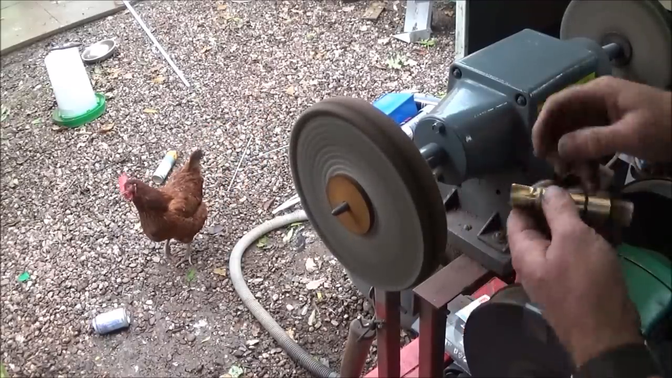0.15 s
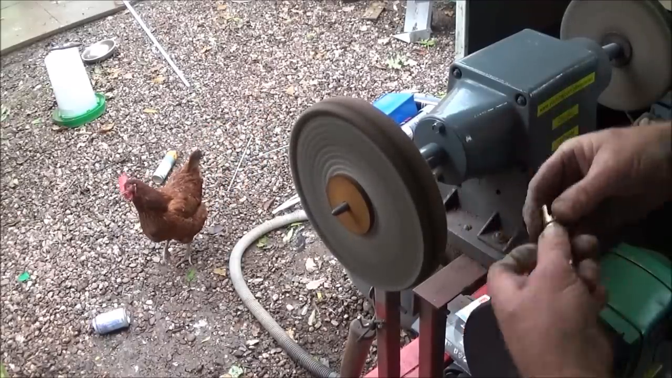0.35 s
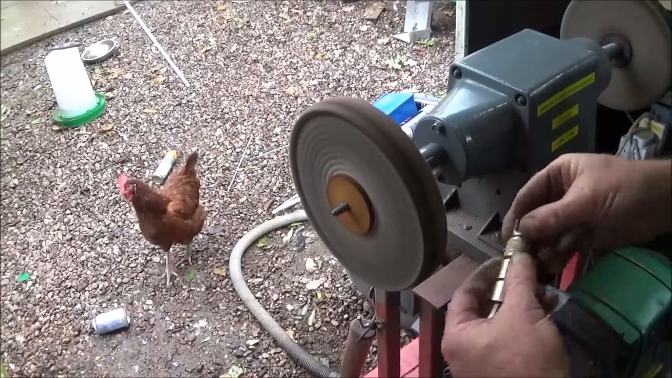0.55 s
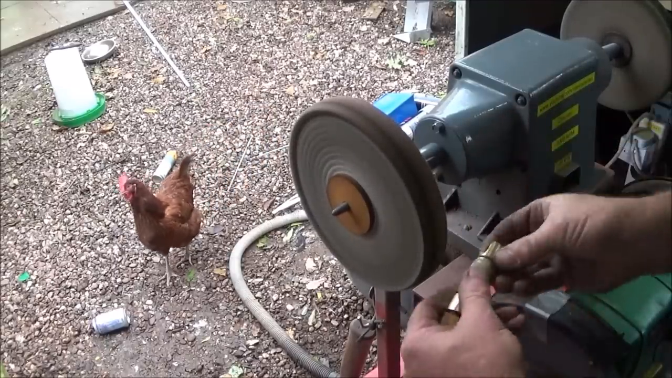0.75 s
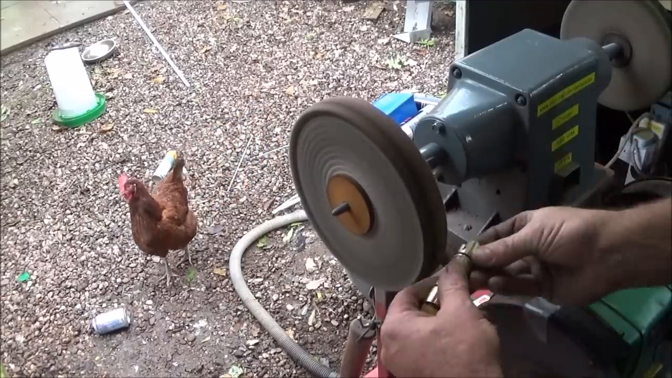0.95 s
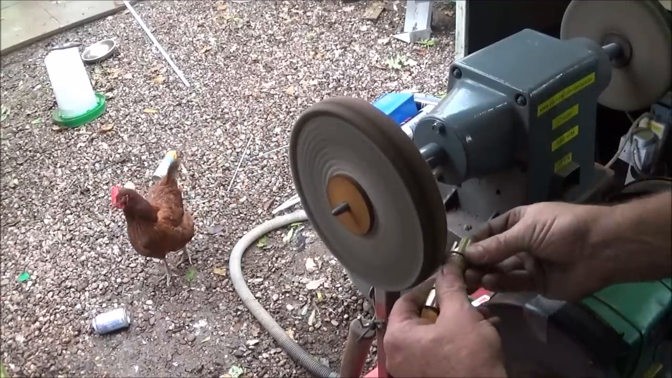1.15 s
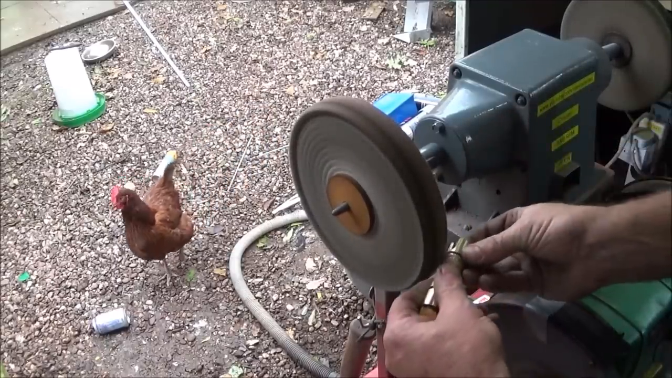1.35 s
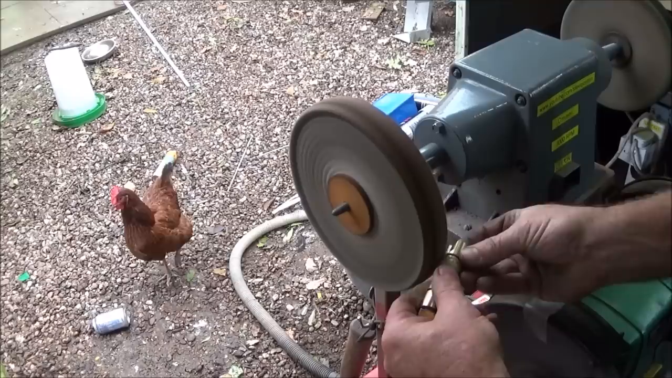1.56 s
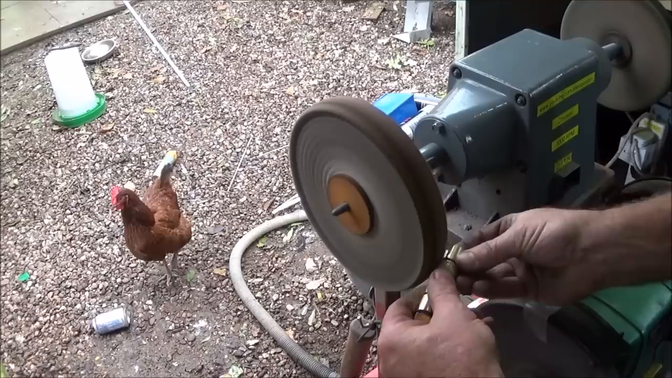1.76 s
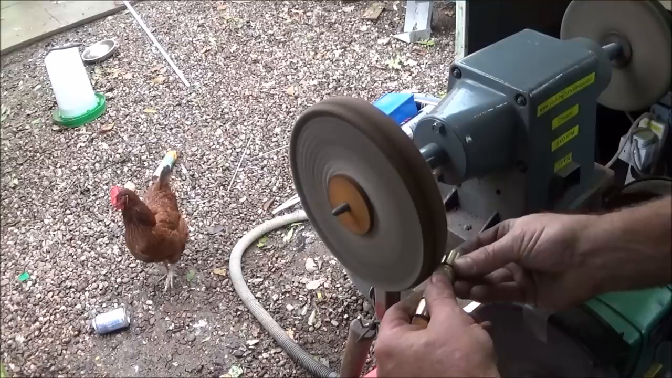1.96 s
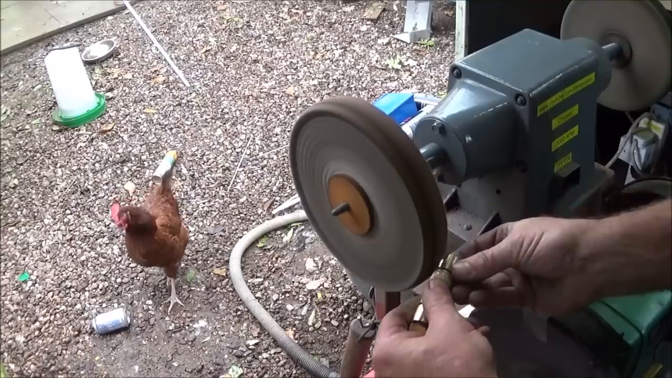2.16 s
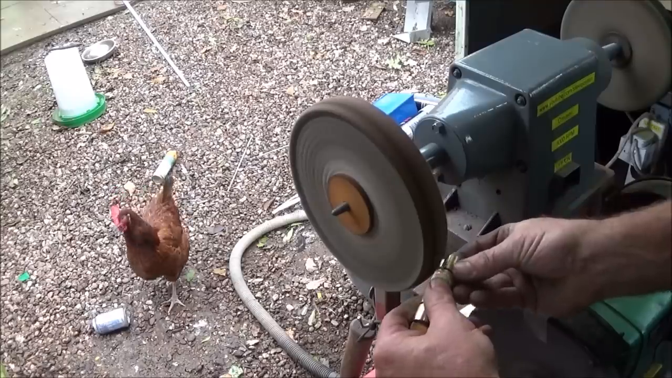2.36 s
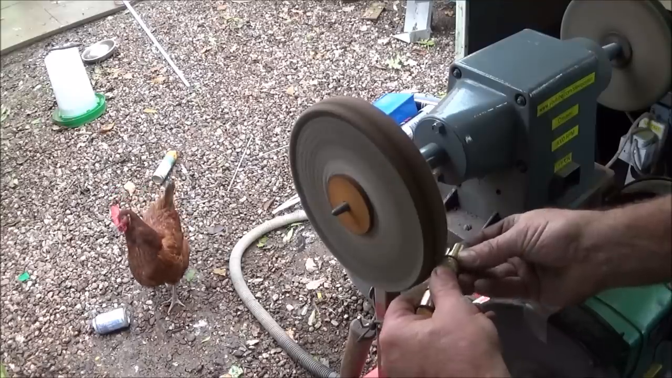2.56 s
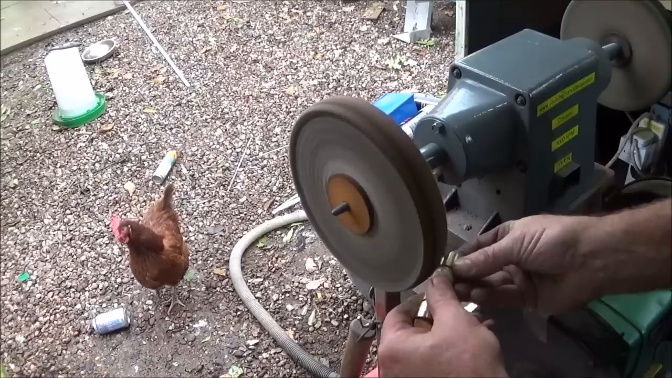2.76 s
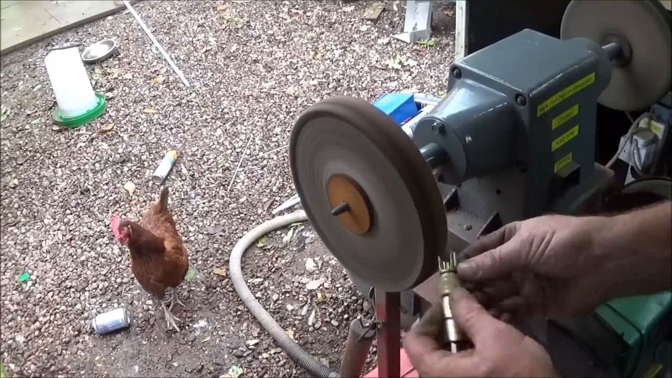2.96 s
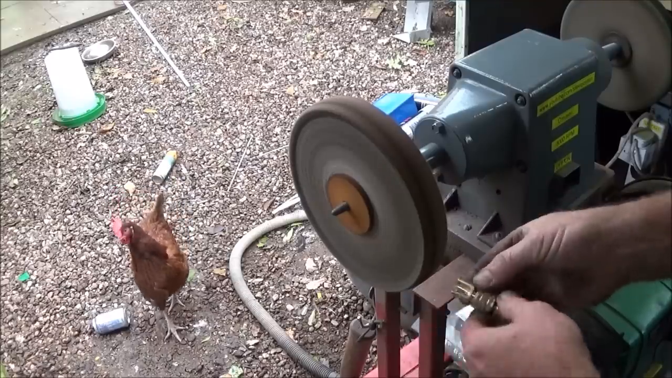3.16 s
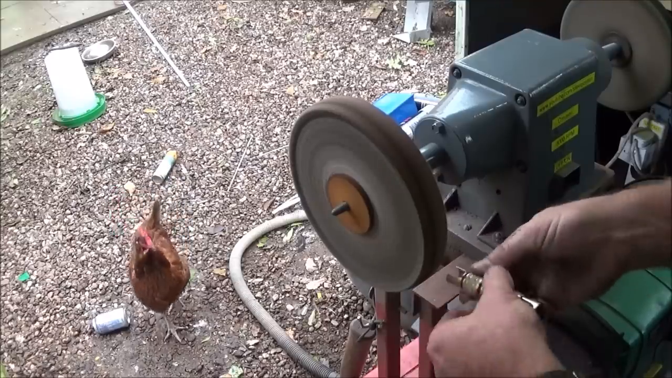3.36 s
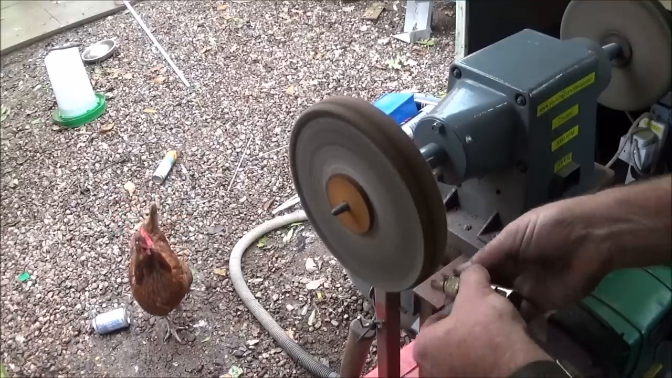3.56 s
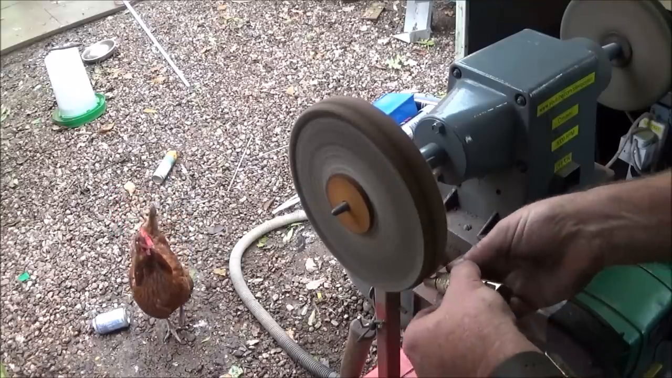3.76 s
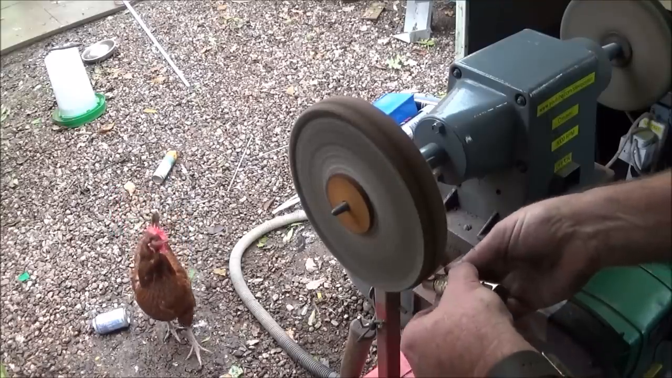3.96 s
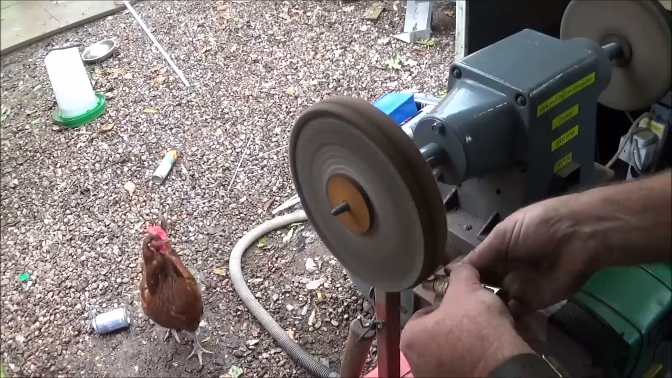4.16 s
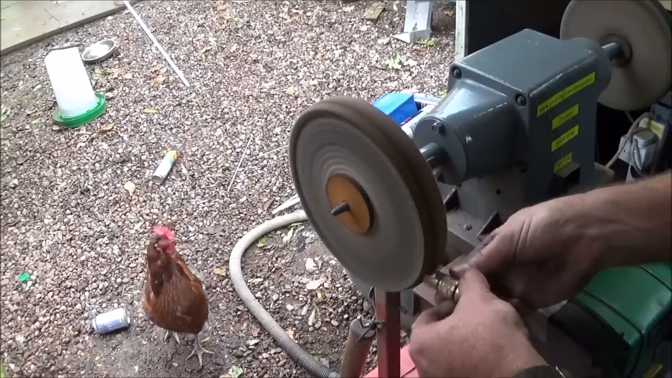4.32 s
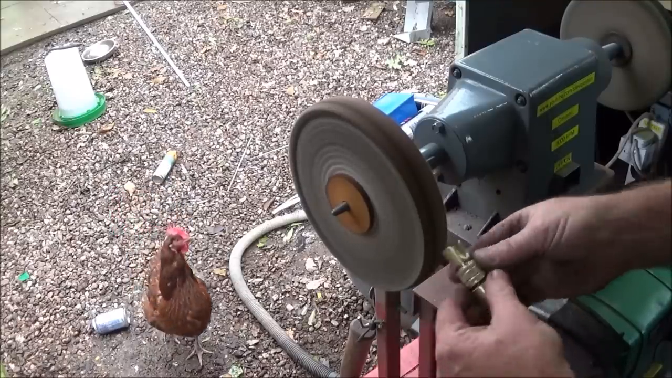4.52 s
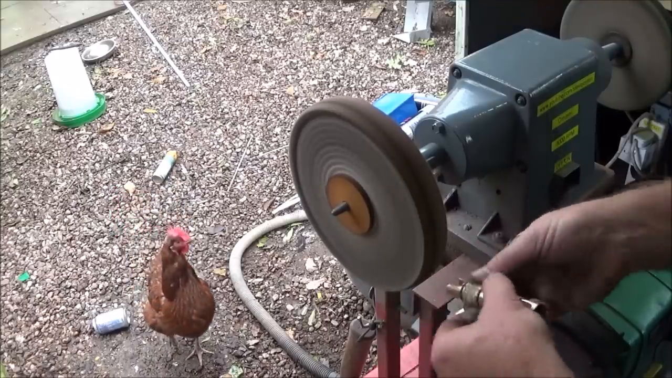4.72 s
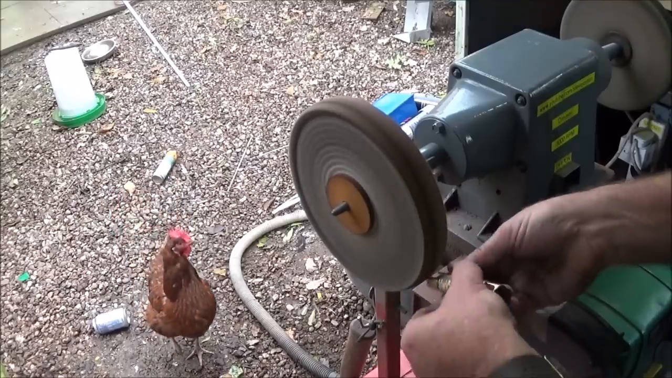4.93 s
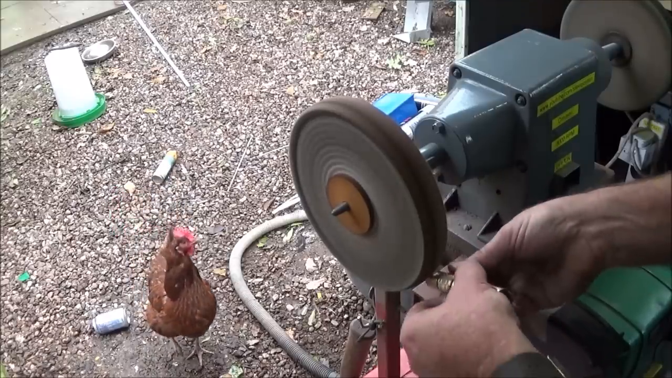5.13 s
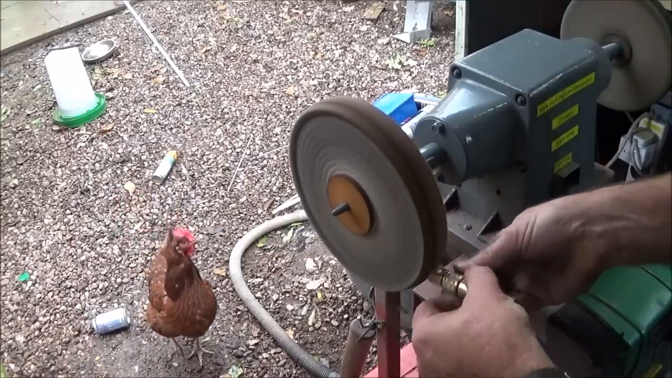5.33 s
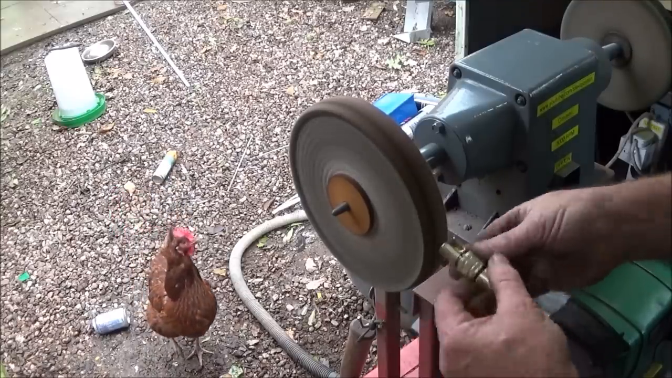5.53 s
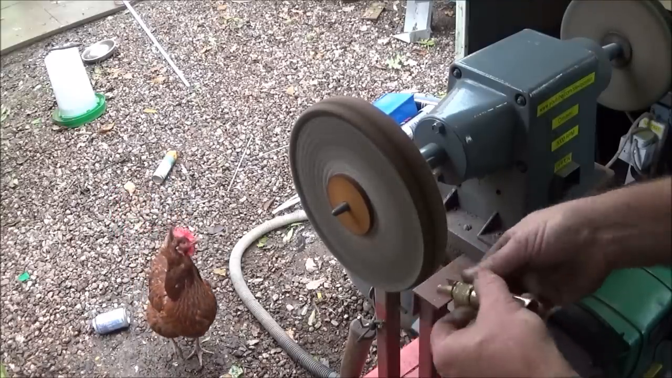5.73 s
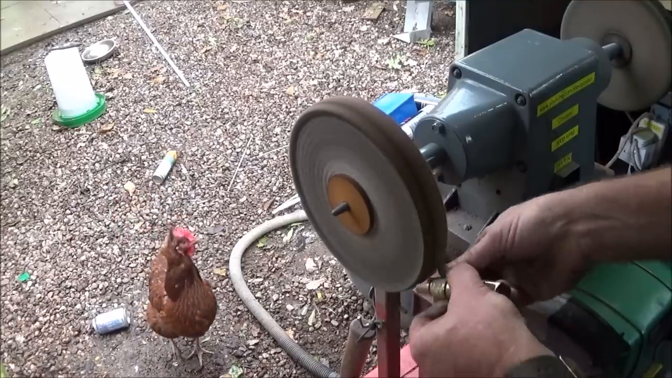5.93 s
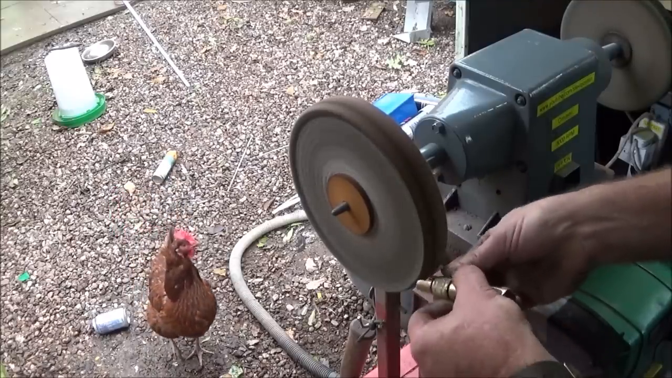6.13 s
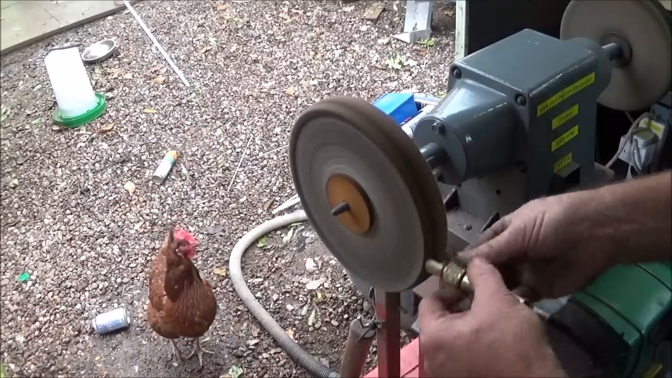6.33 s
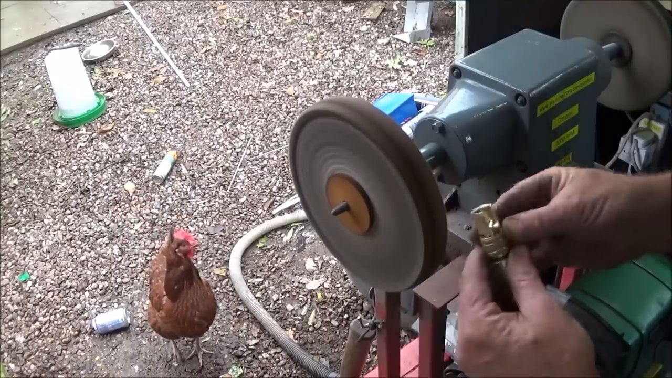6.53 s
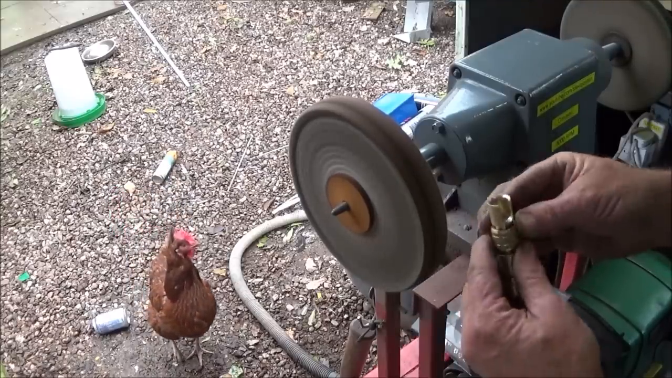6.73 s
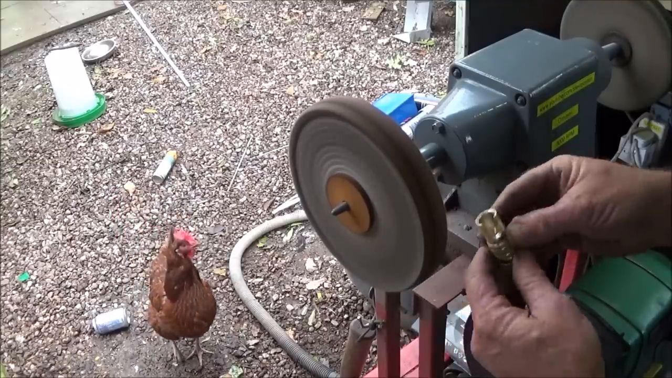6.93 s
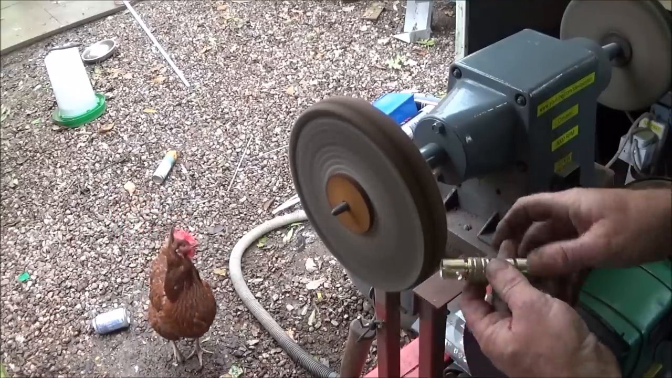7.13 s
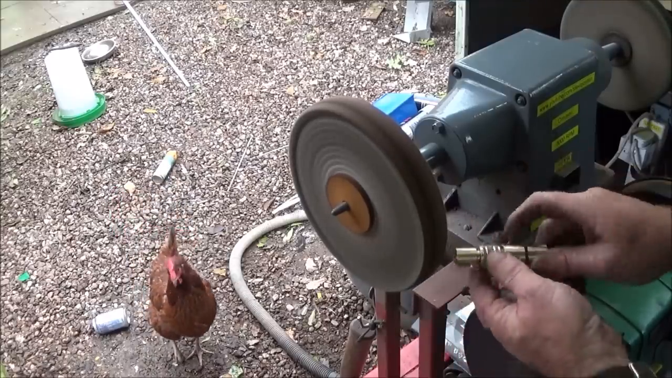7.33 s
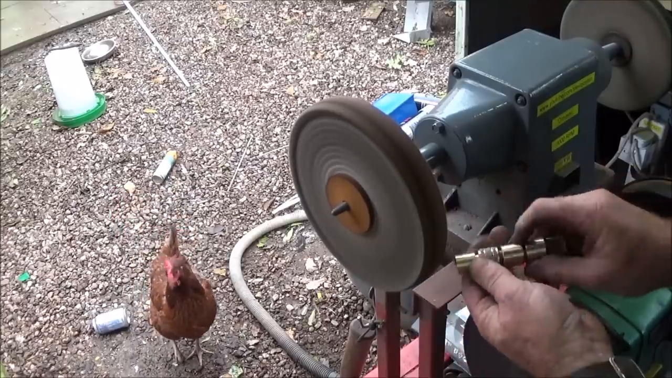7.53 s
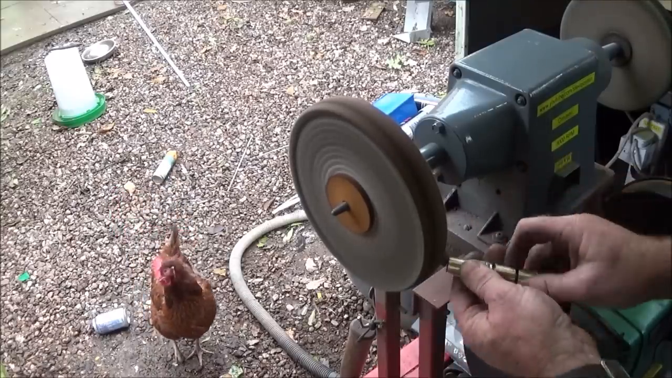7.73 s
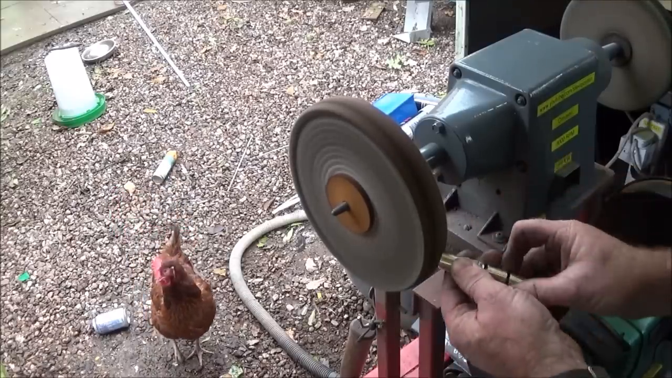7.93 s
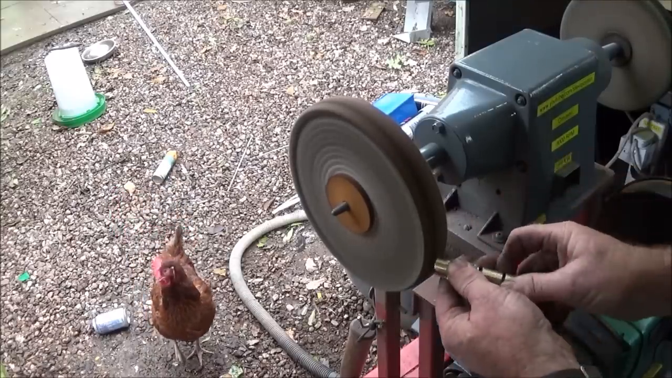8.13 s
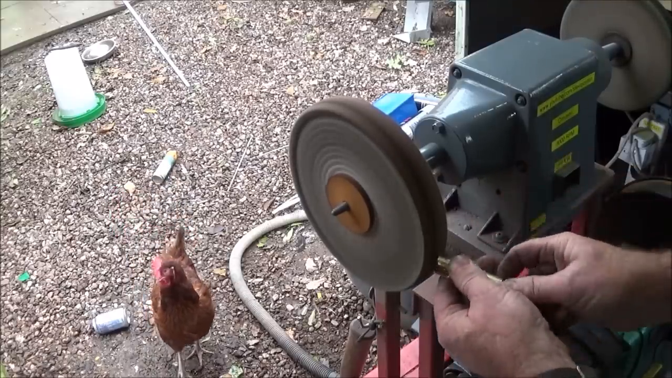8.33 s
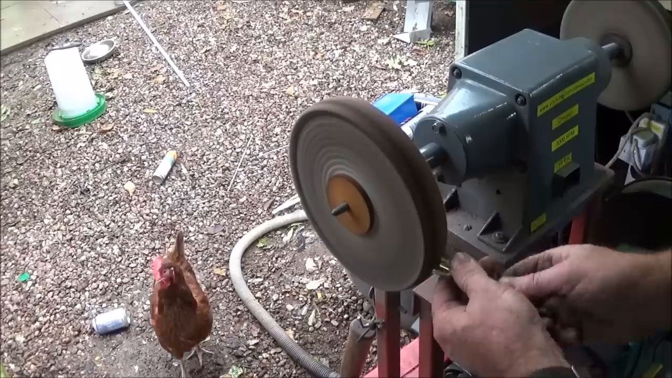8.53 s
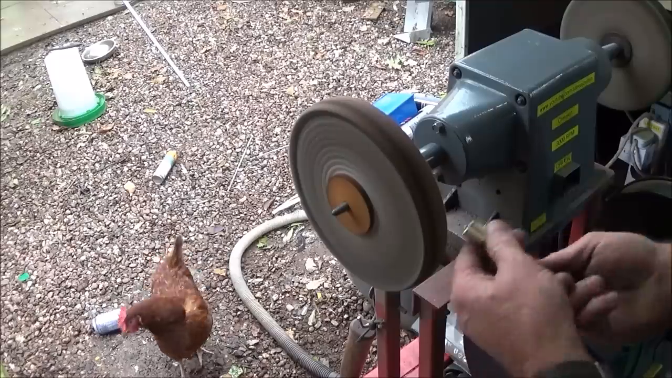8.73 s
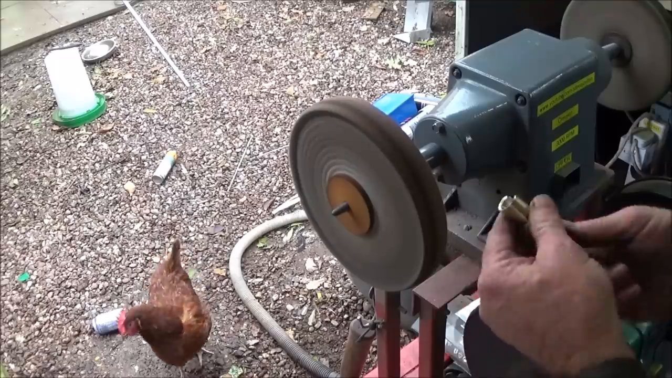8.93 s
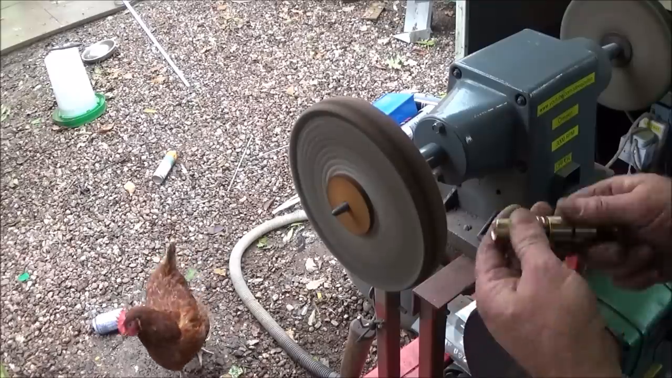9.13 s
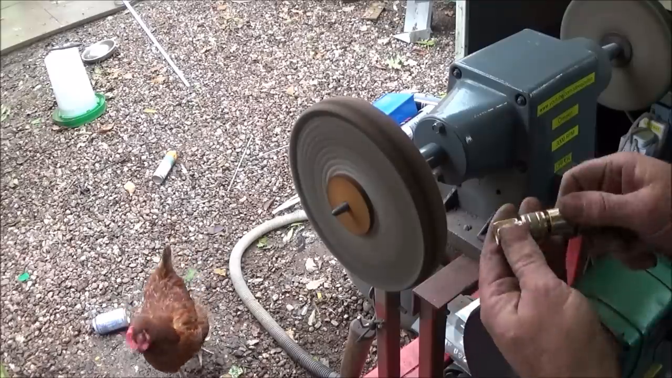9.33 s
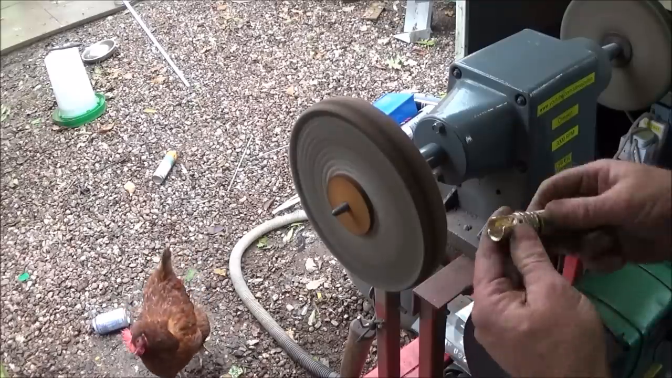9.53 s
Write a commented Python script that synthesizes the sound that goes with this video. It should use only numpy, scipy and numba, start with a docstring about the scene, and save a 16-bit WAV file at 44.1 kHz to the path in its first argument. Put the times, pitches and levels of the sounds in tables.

```python
"""A motor's hum, whine and airy wash sound throughout: a bench polisher turns a cloth wheel at the mouth of a shed.
The hum is a set of shaft harmonics, the whine wavering bearing tones, the wash noise that throbs as balls pass.
A small brass part is pressed on the wheel six times: repeating noise hisses, resonators ring, the shaft slows.
Hard knocks are decaying noise bursts; late on, a hen clucks softly nearby in gliding tones.
An automatic gain control ducks under the rubs and creeps back up."""
import sys
import numpy as np
from scipy import signal
from scipy.fft import rfft, irfft
from scipy.io import wavfile
from scipy.ndimage import uniform_filter1d
from numba import njit

SR = 44100
rng = np.random.default_rng(int(sys.argv[2]) if len(sys.argv) > 2 else 0)


def materialize(psi):
    """Save the field psi as 16-bit PCM at rate SR to the path in sys.argv[1].

    A 1-D psi becomes a single channel; in a 2-D psi each row is a channel.
    """
    bounded = np.clip(np.atleast_2d(psi).T, -1, 1)
    quanta = np.round(bounded * 32767).astype(np.int16)
    wavfile.write(sys.argv[1], SR, quanta)


N = 422478

# Harmonics of shaft rotation: shaft_order, level_db (rms), left_minus_right_db
SHAFT_HARMONICS = [(1, -50.5, 3), (2, -51.5, 2), (3, -30.5, 2), (4, -49, -10), (5, -42, 2), (6, -40.5, 1),
                   (7, -38.5, 2), (8, -42, -7.5), (9, -53.5, -14), (10, -49.5, 3), (11, -53.5, 12),
                   (12, -42, -3.5), (13, -52, -12), (17, -51.5, 6), (19, -50.5, -2), (21, -41.5, 3),
                   (23, -76, -5)]
# Bearing tones at free shaft speed: pitch_hz, relative_level_db
BEARING_TONES = [(2509, -43), (3881, -45), (4124, -38), (4167, -38), (4312, -41), (4371, -42),
                 (4619, -41.5), (4657, -43), (4861, -35.5), (4899, -36.5), (4963, -36), (5098, -38),
                 (5157, -38.5), (5200, -42), (5356, -41), (5588, -41), (5954, -40.5), (5992, -39),
                 (6078, -46), (6191, -45.5)]
# Spectrum of motor casing and windage: frequency_hz, relative_density_db
WASH_SPECTRUM = [(30, -32), (75, -27), (120, -21.5), (210, -21.5), (350, -12), (700, -16), (1060, -15.5),
                 (1500, -16), (3200, -15), (4700, -16), (6200, -18), (8000, -20.5), (10300, -20),
                 (13000, -34), (15800, -41)]
# Hiss spectrum of the cloth weave: frequency_hz, relative_density_db
WEAVE_SPECTRUM = [(1500, -43), (2800, -25), (3900, -3), (4800, 2), (5800, 1), (7400, -9.5), (8500, -12),
                  (10500, -41)]
# Hiss spectrum of the broad cloth folds: frequency_hz, relative_density_db
FOLDS_SPECTRUM = [(200, -45), (600, -15.5), (1300, -15), (2000, -5.5), (3000, -4.2), (3700, -6),
                  (4300, -19)]
# Hiss spectrum of the single fibres: frequency_hz, relative_density_db
FIBRES_SPECTRUM = [(4000, -49), (6500, -8), (8500, -1), (10000, 7), (11200, -2), (12500, -4.5),
                   (13800, -28), (15800, -39)]
# Brass modes: pitch_hz, width_hz, relative_level_db, ringing part ("stem" or "tip")
BRASS_MODES = [(8840, 72, -0.3, "stem"), (9060, 89, -17.5, "stem"), (10660, 40, -12.5, "stem"),
               (13100, 35, -8, "tip"), (14550, 25, 5.5, "tip")]
# Lower body modes, keyed by letter from low to high: pitch_hz, width_hz, level_db (re the hiss)
BODY_MODES = {"a": (1620, 160, -14), "b": (2650, 50, -14), "c": (3200, 100, -16), "d": (3480, 260, -9),
              "e": (4100, 100, -16), "f": (4700, 250, -12), "g": (5130, 120, -14), "h": (5790, 80, -14),
              "i": (6370, 70, -18), "j": (8050, 120, -13)}
# Grips that free some body modes: start_s, end_s, letters of the free modes, level_db
GRIP_SPANS = [(1.9, 2.26, "fi", -2), (2.397, 2.87, "j", -3), (3.7, 4.05, "beg", -3), (4.0, 4.33, "bce", -4),
              (4.354, 4.49, "d", 1), (4.962, 5.22, "bef", -7), (5.174, 5.4, "adeh", -10),
              (5.36, 5.506, "acde", -9), (5.877, 6.205, "bdf", -4.5), (6.207, 6.4, "df", 0),
              (8.0, 8.243, "ghj", -3), (8.2, 8.465, "cghj", 2), (8.424, 8.653, "cg", -4)]
# Rubs: fibres_db, folds_db (both re the weave hiss), pressure curve;
# curve: time_s, pressure_db (as hiss level), stem_ring_db, tip_ring_db (both re the hiss)
RUB_CURVES = [(-2.5, -4.5, [(1.4, -33.5, -23, -35), (1.56, -27, -23, -35), (1.81, -16.5, -6, -35),
              (1.98, -14, 3.5, -27), (2.23, -16, 8, -25)]), (-3, -4, [(2.406, -26, 9.5, -17),
              (2.49, -15.5, -2, -23), (2.58, -18, 1, -40), (2.65, -22, -6, -22), (2.75, -12, 7, -14),
              (2.84, -11.5, 6.5, -20)]), (-3.5, -6, [(3.734, -23, 17, 0), (3.81, -20, 5.5, -12),
              (3.97, -19.5, 5.5, -16), (4.14, -20.5, 1.5, -22), (4.3, -12.5, 7, -15),
              (4.38, -7.5, 4.5, -18), (4.462, -10, -11, -20)]), (-6.5, -5.5, [(4.995, -20, 6.5, -39),
              (5.07, -19.5, -2.5, -35), (5.3, -14, 5, -33), (5.41, -11, -3, -36), (5.482, -14, -1, -32)]),
              (-8.5, -5.5, [(5.91, -22, 3, -32), (6.02, -17, -3.5, -38), (6.13, -16.5, -5.5, -27),
              (6.28, -8, 3, -25), (6.362, -9, -3.5, -24)]), (-4, -9, [(7.995, -30.5, -12, -33),
              (8.09, -19, -12, -42), (8.31, -14, -16, -17), (8.46, -13, -26, -37), (8.55, -10, -1.5, -30),
              (8.62, -14.5, -5, -9)])]
# The part knocks a seam of the wheel: start_s, peak_db
SEAM_KNOCKS = [(2.2627, -2), (2.4199, -9), (3.7185, -10)]
# Stereo width: level of the left-right difference, the highest treble nearly mono:
# frequency_hz, level_db (re the centre)
WIDTH_SPECTRUM = [(30, -24), (70, -14), (150, -54), (300, -19.5), (450, -18), (700, -9), (1300, -9),
                  (2400, -11), (4400, -13), (8100, -14), (11000, -22.5), (12500, -71)]
# Hen calls: start_s, length_s, start_pitch_hz, end_pitch_hz, level_db (rms), left_minus_right_db
HEN_CALLS = [(9.084, 0.04, 587, 626, -41, 5), (9.39, 0.055, 845, 880, -36, -1),
             (9.46, 0.161, 482, 555, -35, 7)]

FREE_HZ, BALL_ORDER = 49.87, 4.925  # unloaded shaft speed; ball passes per shaft turn
SLIP_HZ, INERTIA_S = .35, .12  # speed lost at a net pressure of -10 dB; lag of the wheel
WASH_DB = -25
LAND_S, LIFT_S = .025, 0.0292  # the part meets and leaves the wheel
WAVER_DB = 1.5  # of fibres and folds as the part turns
FIRM_DB = -17  # pressure at which the cloth is half packed down
BOUNCE = .2  # strength of the bounce of a light touch
ECHO_S = 0.012  # decay time constant
START_DB, CREEP_DB_PER_S, LEARN_PER_S = -1.6, 5.5, 2.94  # slow gain stage
CEILING_DB, SQUEEZE = -14, 0.82  # where quick cuts start; share of the excess that is cut
ATTACK_S, RELEASE_S, TOP_HZ = 0.019, 0.0061, 15800


def undb(db):
    """Decibels are twenty times the logarithm of an amplitude ratio."""
    return 10 ** (np.asarray(db) / 20)


def level(x, db):
    """Scaling by the root mean square fixes a signal's average power."""
    return x * undb(db) / np.sqrt(np.mean(x ** 2))


def colour(x, shape):
    """Linear filtering multiplies a spectrum by a (frequency_hz, level_db) response."""
    hz, db = np.transpose(shape)
    bin_hz = np.arange(N // 2 + 1) * SR / N
    response_db = np.interp(np.log(bin_hz + 1), np.log(hz), db)
    return irfft(rfft(x) * undb(response_db), N)


def walk(rate):
    """Slow fluctuation: random levels every 1 / rate s joined by smooth steps; spread near 1."""
    knots = rng.standard_normal(size=400)
    place = np.arange(N // 64 + 2) * 64 / SR * rate  # one point per 64 samples
    k = place.astype(int)
    ease = (1 - np.cos(np.pi * (place - k))) / 2
    smooth = 1.15 * (knots[k] * (1 - ease) + knots[k + 1] * ease)
    return np.interp(np.arange(N) / 64, np.arange(len(k)), smooth)


def pan(left_minus_right_db):
    """A level difference between two channels displaces the sound image."""
    return undb(np.array([[left_minus_right_db], [-left_minus_right_db]]) / 2)


@njit
def repeat(fresh, lag, keep):
    """Rotational periodicity: part of the noise comes round again one shaft turn later."""
    y = fresh.copy()
    for i in range(1000, len(y)):
        y[i] = keep * y[i - lag[i]] + np.sqrt(1 - keep ** 2) * fresh[i]
    return y


def hum(turns):
    """Periodic forces on a rotating shaft radiate at whole multiples of its speed."""
    out = np.zeros((2, N))
    lead = np.array([[.16], [-.16]])  # radians: the left channel leads
    for order, db, pan_db in SHAFT_HARMONICS:
        waver = .4 if order < 3.5 else 2.4  # higher orders waver more
        scatter = .08 if 2.5 < order < 10.5 else 1  # orders 3-10 stay in step: a soft thud each turn
        cycles = order * turns - 1 / 4 + scatter * rng.random()
        phase = 2 * np.pi * cycles + 0.17 * waver * walk(8)
        tone = undb(db + waver * walk(6)) * np.sin(phase + lead)
        out += np.sqrt(2) * tone * pan(pan_db)
    return out


def bearing_whine(turns):
    """Rolling contact excites tones whose pitch follows the shaft speed."""
    out = np.zeros(N)
    for hz, db in BEARING_TONES:
        phase = 2 * np.pi * hz / FREE_HZ * turns + 0.97 * walk(9)
        out += undb(db - 4.5 + 2.26 * walk(5)) * np.sin(phase) * np.sqrt(2)
    return out


def wash(turns, lag):
    """Amplitude modulation: casing and windage noise throbs with ball passes and shaft turns."""
    throb = 1 + 0.051 * np.cos(2 * np.pi * BALL_ORDER * turns) + 0.034 * np.cos(2 * np.pi * turns)
    rumble = repeat(rng.standard_normal(N), lag, .4)
    air = rng.standard_normal(N) * throb * undb(.5 * walk(6))
    # the casing repeats each turn in the bass, the windage above it does not
    low_pass = signal.butter(2, 2600, fs=SR, output="sos")
    mixed = air + signal.sosfiltfilt(low_pass, rumble - air)
    return level(colour(mixed, WASH_SPECTRUM), WASH_DB)


def motor(turns, lag):
    """Superposition: shaft harmonics, bearing tones and broadband wash add linearly."""
    return hum(turns) + bearing_whine(turns) + wash(turns, lag)


def hand():
    """Contact force sets friction noise: gives pressure and the levels of folds, fibres, stem and tip."""
    t, press, rows = np.arange(N) / SR, np.zeros(N), []
    for fibres_db, folds_db, curve in RUB_CURVES:
        s, db, stem_db, tip_db = np.transpose(curve)
        times = np.r_[s[0] - LAND_S, s, s[-1] + LIFT_S]
        press += np.interp(t, times, np.r_[0, undb(db), 0])
        rows += [(a, folds_db, fibres_db, b, c) for a, b, c in zip(s, stem_db, tip_db)]
    s, *columns = np.transpose(rows)
    folds_db, fibres_db, stem_db, tip_db = (np.interp(t, s, c) for c in columns)
    press = np.maximum(press - undb(-38), 0)  # the lightest touch is silent
    return press, folds_db + WAVER_DB * walk(10), fibres_db + WAVER_DB * walk(10), stem_db, tip_db


def loose(press):
    """Compaction under load: near 1 for a light touch, falling towards 0 as the cloth packs down."""
    return 1 / (1 + (press / undb(FIRM_DB)) ** 2)


def ring(x, hz, width):
    """Resonance: one mode passes a narrow band, scaled to keep the level of white noise."""
    b, a = signal.iirpeak(hz, hz / width, fs=SR)
    return signal.lfilter(b, a, x) / np.sqrt(np.pi * width / SR)


def grips(x):
    """Modal density: six random short rings stand for many small modes and trade places as the grip shifts."""
    n = SR // 20
    tails = rng.standard_normal(size=(6, n)) * np.exp(-np.arange(n) / SR / 0.0026)
    shares = np.array([undb(5.2 * walk(5)) for _ in tails])
    shares /= np.sqrt(np.sum(shares ** 2, axis=0))
    return sum(a * level(signal.fftconvolve(x, tail)[:N], 0) for a, tail in zip(shares, tails))


def brass(fine, press, stem_db, tip_db):
    """Forced and free vibration: modes are driven during contact and ring on after it."""
    stem_db = stem_db + .9 * np.minimum(stem_db + 3, 0)  # a finger on the stem chokes a weak ring further
    part_db = {"stem": stem_db, "tip": tip_db}
    out = np.zeros(N)
    for hz, width, db, part in BRASS_MODES:
        drive = fine * press * undb(db + part_db[part] + 1.3 * walk(18.0))
        out += ring(drive, hz, width)
    return out


def body(force):
    """Selective damping: each grip leaves only some of the lower modes free to ring."""
    out = np.zeros(N)
    for start, end, free, grip_db in GRIP_SPANS:
        span = slice(int(start * SR), int(end * SR))
        modes = map(BODY_MODES.get, free)
        rings = sum(ring(force[span], hz, width) * undb(db) for hz, width, db in modes)
        out[span] += rings * undb(grip_db) * signal.windows.tukey(span.stop - span.start, .3)
    return out


def rub(turns, lag, press, folds_db, fibres_db, stem_db, tip_db):
    """Sliding friction: the cloth drags much the same lumps past the part every turn and drives its modes."""
    lumps = 1 + 0.027 * np.cos(2 * np.pi * turns) + 0.078 * np.cos(4 * np.pi * turns + 1.1)
    # a light touch bounces once and three times a turn
    bounce = np.cos(2 * np.pi * turns) + 1.5 * np.cos(6 * np.pi * turns + 1.)
    lumps = lumps * np.exp(BOUNCE * loose(press) * bounce)
    drag = repeat(rng.standard_normal(N), lag, .7) * lumps * undb(0.32 * walk(14))
    fine = 0.78 * drag + 0.48 * rng.standard_normal(N) * lumps  # single fibres never land twice alike
    held = 0.95 * drag + 0.52 * grips(drag)
    weave = level(colour(held, WEAVE_SPECTRUM), -0.7)
    folds = level(colour(held, FOLDS_SPECTRUM), -0.4) * undb(folds_db)
    fibres = level(colour(fine, FIBRES_SPECTRUM), .1) * undb(fibres_db)
    hiss = press * (weave + folds + fibres)
    return hiss + brass(fine, press, stem_db, tip_db) + body(drag * press)


def ticks():
    """Impact: a brief contact gives a broadband burst that decays within milliseconds."""
    out, n = np.zeros(N), SR // 200
    band = signal.butter(2, [1800, 8000], "band", fs=SR, output="sos")
    decay = np.exp(-np.arange(n) / SR / 0.00047)
    for s, db in SEAM_KNOCKS:
        knock = signal.sosfilt(band, rng.standard_normal(n) * decay)
        out[int(s * SR):int(s * SR) + n] += undb(db) * knock / np.abs(knock).max()
    return out


def stereo_width(near):
    """Decorrelation: a short diffuse echo enters the two channels in opposite sign and widens the image."""
    n = SR // 2
    tail = rng.standard_normal(n) * np.exp(-np.arange(n) / SR / ECHO_S)
    echo = signal.fftconvolve(near.mean(axis=0), tail / np.sqrt(np.sum(tail ** 2)))[:N]
    return colour(echo, WIDTH_SPECTRUM) * np.array([[1], [-1]])


def hen():
    """Voiced sound: soft closed-beak clucks glide in pitch, hoarse from modulation at a third of it."""
    out = np.zeros((2, N + SR))
    for s, length, hz0, hz1, db, pan_db in HEN_CALLS:
        n = int(length * SR)
        phase = 2 * np.pi * np.cumsum(np.linspace(hz0, hz1, n)) / SR
        voice = np.sin(phase) + 0.27 * np.sin(2 * phase)
        hoarse = 1 + 0.25 * np.sin(phase / 3)
        call = voice * np.sqrt(np.hanning(n)) * hoarse
        out[:, int(s * SR):int(s * SR) + n] += level(call, db) * pan(pan_db)
    return out[:, :N]


def shaft_speed(press):
    """Rotational inertia: the load of a rub slows the shaft with an exponential lag."""
    keep = np.exp(-1 / (INERTIA_S * SR))
    return FREE_HZ - signal.lfilter([1 - keep], [1, -keep], SLIP_HZ * press / undb(-10))


def scene():
    """Superposition: motor, rubs, knocks, their stereo width and the hen add linearly."""
    press, *tone_db = hand()
    hz = shaft_speed(press)
    turns, lag = np.cumsum(hz) / SR, np.round(SR / hz).astype(np.int64)  # lag: samples per turn
    near = motor(turns, lag) + rub(turns, lag, press, *tone_db) + ticks()
    return near + stereo_width(near) + hen()


@njit
def gain_control(power, slow_db, creep, learn, ceiling_db, squeeze, attack, release):
    """Feedback control: a quick stage cuts above the ceiling; a slow one creeps up and learns from the cuts."""
    gain_db, e = np.empty(len(power)), power[0]
    for i in range(len(power)):
        e += (power[i] - e) * (attack if power[i] > e else release)
        cut = squeeze * max(10 * np.log10(e) + slow_db - ceiling_db, 0.)
        slow_db += creep - learn * cut
        gain_db[i] = slow_db - cut
    return gain_db


def record(dry):
    """Compression and saturation: two-stage gain control, rounded then clipped peaks, treble cut."""
    power = uniform_filter1d(np.mean(dry ** 2, axis=0), size=440) + 1e-12  # 10 ms mean
    gain_db = gain_control(power, START_DB, CREEP_DB_PER_S / SR, LEARN_PER_S / SR, float(CEILING_DB), SQUEEZE,
                           1 / (ATTACK_S * SR), 1 / (RELEASE_S * SR))
    loud = 1.378 * np.tanh(dry * undb(gain_db) / 1.26)
    top_cut = signal.ellip(12, .3, 95, TOP_HZ, fs=SR, output="sos")
    return signal.sosfilt(top_cut, np.clip(loud, -.86, .86))


dry = scene()
out = record(dry)
materialize(out)
```